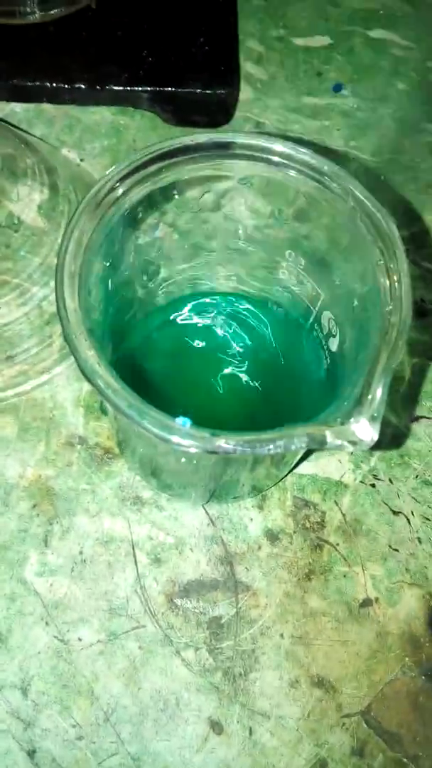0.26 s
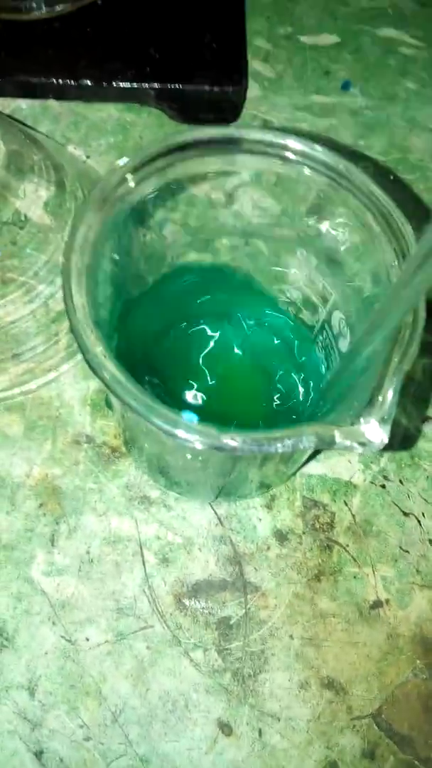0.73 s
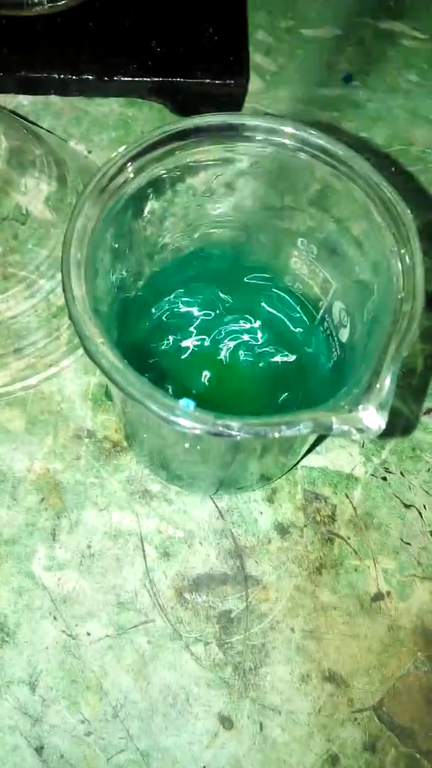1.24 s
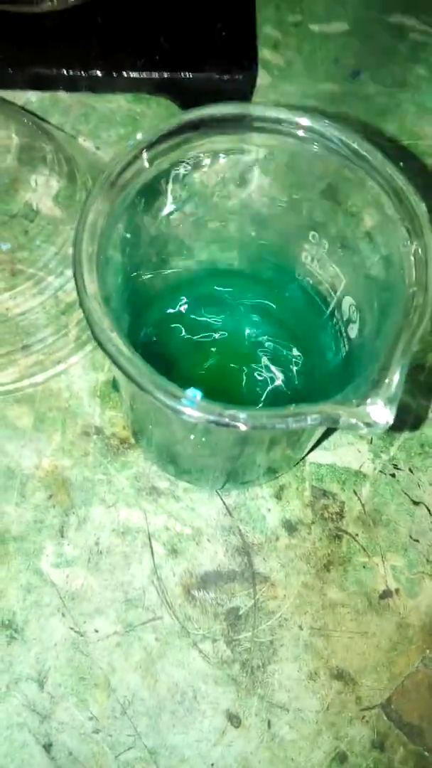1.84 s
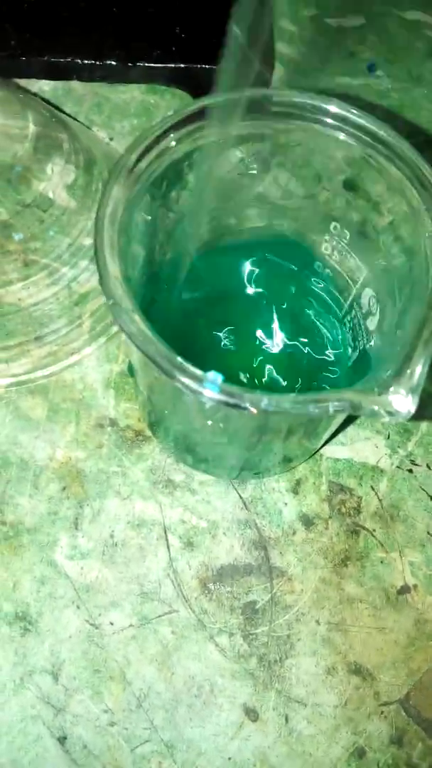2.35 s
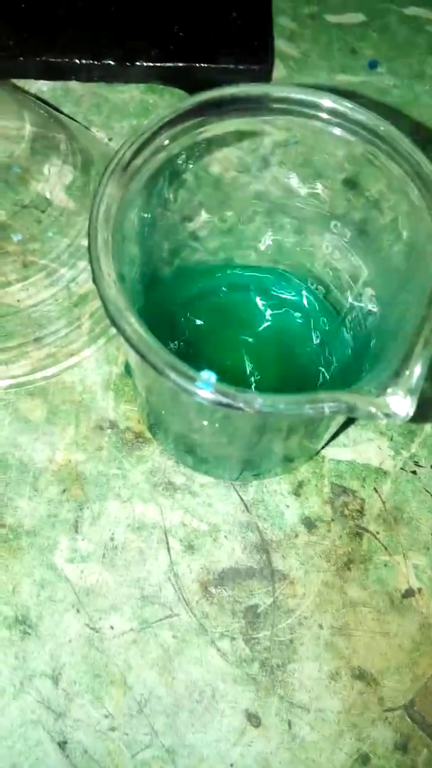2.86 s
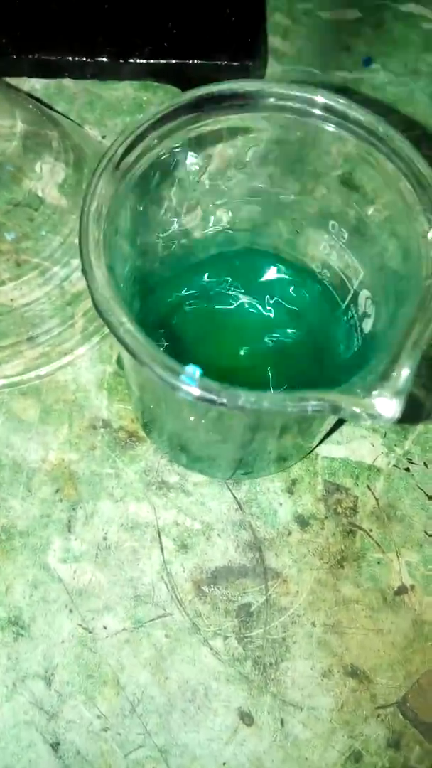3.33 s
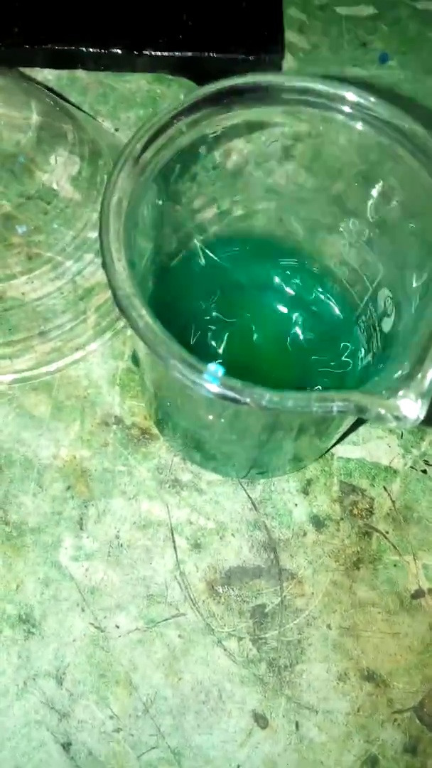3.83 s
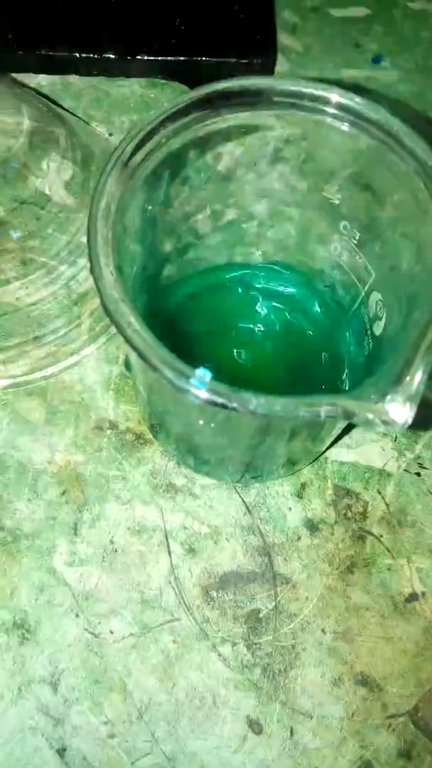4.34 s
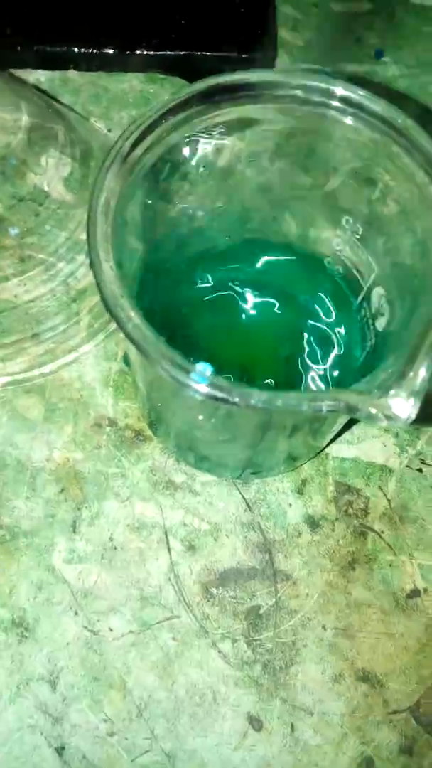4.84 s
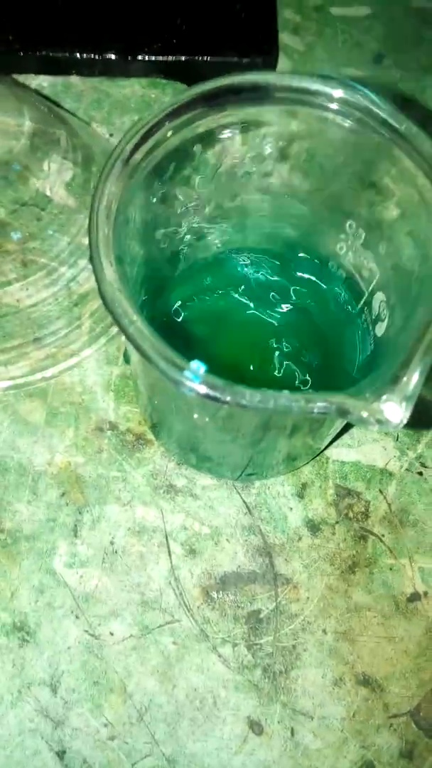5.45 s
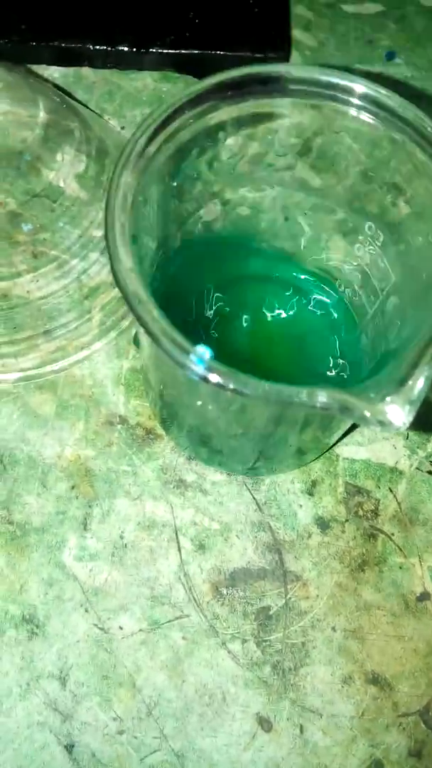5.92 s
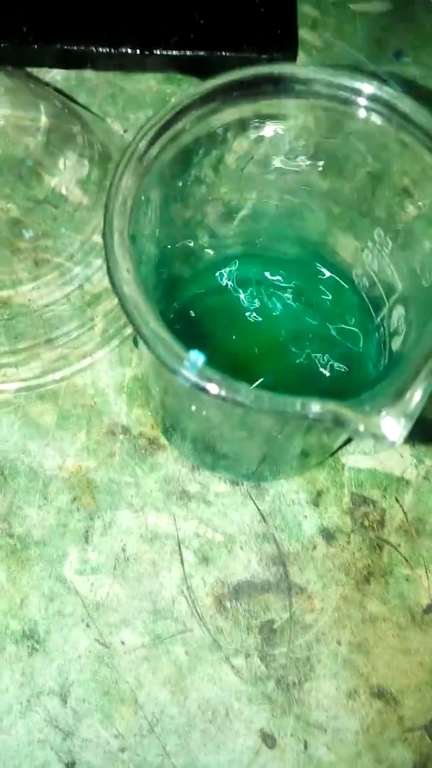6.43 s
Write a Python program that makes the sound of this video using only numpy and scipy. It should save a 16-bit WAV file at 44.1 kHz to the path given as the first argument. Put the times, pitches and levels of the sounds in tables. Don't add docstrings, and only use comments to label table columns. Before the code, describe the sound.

A glass rod clinks quickly and irregularly against a small glass beaker while stirring liquid, with tiny gulping bubbles and a low room murmur.

```python
import sys
import numpy as np
from scipy import signal
from scipy.fft import rfft, irfft
from scipy.io import wavfile
from scipy.ndimage import uniform_filter1d

SR = 44100
rng = np.random.default_rng(int(sys.argv[2]) if len(sys.argv) > 2 else 0)


def makeup_ratio(level_db):
    decades = np.asarray(level_db, float) / 20
    return 10 ** decades


def pcm_store(signal):
    levels = np.round(np.clip(np.atleast_2d(signal), -1, 1) * 32767)
    wavfile.write(sys.argv[1], SR, levels.astype(np.int16).T)


N = 294588


def evened(x):
    return x / np.sqrt(np.mean(x ** 2) + 1e-20)


def read(points, hz):
    f, value = np.transpose(points)
    return np.interp(np.log(hz + 1), np.log(f + 1), value)


def curves(rows):
    s, *columns = np.transpose(rows)
    return [np.interp(np.arange(N) / SR, s, column) for column in columns]


def add(mix, s, sound):
    part = mix[round(s * SR):][:len(sound)]
    part += sound[:len(part)]


def ring(x, hz, t60):
    turn = np.exp(2j * np.pi * np.cumsum(hz * np.ones(len(x))) / SR)
    decay = 10 ** (-3 / (t60 * SR))
    return (turn * signal.lfilter([1], [1, -decay], x / turn)).imag


def coloured(x, points):
    gain = makeup_ratio(read(points, np.fft.rfftfreq(len(x), 1 / SR)))
    return irfft(rfft(x) * gain, len(x))


def slow(hz):
    pole = [1, -np.exp(-2 * np.pi * hz * 32 / SR)]
    coarse = rng.standard_normal(N // 32 + 2)
    coarse = signal.lfilter([1], pole, signal.lfilter([1], pole, coarse))
    return np.interp(np.arange(N) / 32, np.arange(len(coarse)), evened(coarse))


# (frequency [Hz], density [dB per Hz])
ROOM_NOISE = [(15, -66), (30, -70), (54, -16.5), (168, 0), (496, -10), (607, 0), (678, -13), (845, -4),
              (1610, -17), (2000, -12.5), (2600, -54), (4400, -120)]
# (frequency [Hz], density [dB per Hz])
MICROPHONE_HISS = [(300, 1), (2000, -29.5), (4500, -40), (9000, -10.5), (13000, -68), (16500, -15.5)]
# (time [s], rise [dB])
SWELLS = [
    (.07, 10),
    (.67, 11),
    (2.3, 13),
    (2.62, -1.5),
    (6.6, 3.5),
]


def air():
    frames, hz = N // 256 + 5, np.fft.rfftfreq(1024, 1 / SR)
    real, imag, patches = rng.standard_normal((frames, 513, 3)).T
    patches = evened(uniform_filter1d(uniform_filter1d(patches, 8, 0), 12, 1))

    t = np.arange(frames) * 256 / SR
    swell_db = -1.0
    for s, db in SWELLS:
        swell_db = swell_db + db * np.exp(-abs(t - s) / np.where(t < s, 0.006, 0.34))
    f = hz[:, None]
    low_share = 1 / (1 + (130 / (f + 1)) ** 2)
    murmur = makeup_ratio(read(ROOM_NOISE, hz)[:, None] + 5.24 * patches + swell_db * low_share)
    hiss = makeup_ratio(read(MICROPHONE_HISS, hz))[:, None] * (f > 200)
    spectrum = (real + 1j * imag) * np.hypot(murmur, hiss)
    noise = signal.istft(spectrum, nperseg=1024, noverlap=768)[1][:N]

    hum = evened(ring(rng.standard_normal(N), 166.6, 0.2))
    hum = hum * makeup_ratio(-9.5 + 5.5 * slow(1.0))
    rumble_hz, heave_s, heave_width_s = 71, 6.36, 0.24
    heave_db = 18 * np.exp(-((np.arange(N) / SR - heave_s) / heave_width_s) ** 2)
    rumble = evened(ring(ring(rng.standard_normal(N), rumble_hz, 0.15), rumble_hz, 0.15))
    rumble = rumble * makeup_ratio(-23 + heave_db)
    return makeup_ratio(-58.5) * coloured(evened(noise) + hum + rumble, [(25, -4), (55, 0)])


# (frequency [Hz], t60 [s])
ROOM_DECAY = [(500, 0.35), (2000, 0.3), (6000, 0.18), (12000, 0.13)]


def room(x):
    taps = np.zeros(SR // 2)
    at = np.arange(200, len(taps) - 20, 20)
    taps[at + rng.integers(0, 20, len(at))] = rng.choice([-1., 1.], len(at))
    hz, t, z = signal.stft(taps, SR, nperseg=256)
    decay = makeup_ratio(-60 * t / read(ROOM_DECAY, hz)[:, None])
    tail = signal.istft(z * decay, SR, nperseg=256)[1]
    return signal.fftconvolve(x, tail / np.linalg.norm(tail))[:N]


# (time [s], level [dB], pitch [Hz])
KNOCKS = [
    (0.688, -44.5, 580),
    (2.242, -40.5, 252),
    (2.635, -62, 330),
    (2.465, -50.5, 644),
    (2.556, -45.5, 420),
    (2.625, -31.5, 680),
    (5.749, -48, 547),
    (6.093, -45, 533),
    (6.5, -45.5, 570),
]


def knocks():
    out, t = np.zeros(N), np.arange(6000) / SR
    for s, db, hz in KNOCKS:
        burst = evened(ring(ring(rng.standard_normal(len(t)), hz, 0.0055), hz, 0.0055))
        add(out, s, makeup_ratio(db - 5.0 - 60 * t / 0.15) * burst * (1 - np.exp(-t / 0.0019)))
    return out


# (time [s], level [dB], pitch [Hz], t60 [s])
BUBBLES = [(0.0966, -32.5, 1070, 0.01), (0.1735, -52.5, 1080, 0.042), (0.2196, -47.5, 1600, 0.026),
           (0.375, -31, 1456, 0.022), (0.5707, -36.5, 1510, 0.018), (0.6876, -22.5, 1850, 0.0093),
           (0.756, -25, 1756, 0.011), (0.8924, -48, 1780, 0.026), (0.9697, -42.5, 1080, 0.028),
           (1.198, -57, 1490, 0.05), (1.904, -34.5, 1597, 0.023), (1.9648, -29, 1547, 0.021),
           (1.987, -41, 1410, 0.024), (2.291, -34, 1870, 0.016), (2.3682, -35.5, 1464, 0.046),
           (2.392, -46, 1450, 0.048), (2.6277, -18.5, 1800, 0.013), (2.6535, -27, 1710, 0.017),
           (2.7354, -45, 1060, 0.024), (3.3333, -33.5, 1702, 0.024), (4.076, -42, 1085, 0.025),
           (5.224, -51, 1088, 0.055), (5.4196, -26.5, 1497, 0.016), (5.6267, -55, 1145, 0.042),
           (6.4745, -41, 1800, 0.018), (6.549, -40.5, 1445, 0.034)]
# (time [s], level [dB], pitch [Hz], t60 [s],
# glide [share of pitch])
DROPLETS = [(0.387, -43.5, 1270, 0.053, 0.092), (0.417, -51, 1315, 0.03, -0.074),
            (.553, -40, 1587, 0.054, -0.1), (0.586, -45.5, 1520, 0.029, 0.11),
            (2.344, -45.5, 1470, 0.092, -0.033), (2.674, -50, 1634, .05, 0.13),
            (5.4372, -45.5, 1334, 0.047, -0.048), (2.024, -46, 2730, 0.026, 0.01),
            (1.032, -39, 2770, 0.031, 0.0018), (1.257, -42, 2720, 0.023, 0.04),
            (1.289, -23.5, 2750, 0.012, 0.096), (2.327, -34, 3700, 0.019, -0.082),
            (2.429, -53, 2700, 0.037, 0.013), (2.996, -48, 2710, 0.037, 0.16),
            (3.495, -16.5, 2920, 0.0088, 0.019), (3.703, -38.5, 5640, 0.018, -0.047),
            (4.195, -53, 3950, 0.048, -0.037), (4.24, -57, 4800, 0.043, 0.043),
            (4.445, -56.5, 4930, 0.044, 0.046), (4.59, -64, 4000, 0.068, -0.045),
            (4.65, -50, 3540, 0.024, -0.027), (5.894, -31.5, 2735, 0.028, -0.12),
            (6.321, -30, 4180, 0.011, -0.1)]


def bubbles():
    out, t = np.zeros(N), np.arange(6000) / SR
    wobble = np.append(slow(124.0), np.zeros(len(t)))
    for s, db, hz, t60, glide in [row + (.035,) for row in BUBBLES] + DROPLETS:
        course = 2 * np.minimum(t / (0.37 * t60), 1) - 1
        pitch = hz * (1 + glide * course + 0.024 * wobble[round(s * SR):][:len(t)])
        gulp = np.sin(2 * np.pi * np.cumsum(pitch) / SR) * makeup_ratio(-60 * t / max(t60, .008))
        splash = evened(ring(ring(rng.standard_normal(len(t)), hz, 0.0054), hz, 0.0057))
        splash = splash * makeup_ratio(-11.0 - 60 * t / (1.88 * t60))
        splash = splash * min(1, (1800 / hz) ** 2)
        add(out, s, makeup_ratio(db + 9.0) * (gulp + splash) * (1 - np.exp(-t / 0.003)) ** 2)
    return out * (1 + 0.14 * slow(290.0))


def liquid():
    return coloured(bubbles() + knocks(), [(60, -42), (200, 4.0)])


# (time [s], blow [dB], upper wall ring [dB], dull part [dB])
CLINKS = [(0.214, -22.5, -35, -23), (0.2966, -25.5, -45, -30), (0.473, -20.5, -48, -12),
          (0.6894, -21.5, -67, -2.5), (0.8869, -22, -35, -10), (1.056, -15.5, -40, -17.5),
          (1.4816, -25.5, -60, -11), (1.6412, -24, -37, -15), (2.2918, -39, -70, 8),
          (2.4144, -20, -38.5, -34), (2.5184, -13.5, -55, -31), (2.626, -19.5, -25.5, -9.5),
          (2.7285, -5, -40, -27), (2.8134, -21.5, -37.5, -39), (2.922, -9, -30, -30.5),
          (3.1896, -37, -40, -34), (3.4108, -33, -39.5, -19), (3.583, -33, -37, -12),
          (4.165, -22, -50, -28), (4.321, -23.5, -34.5, -23), (4.6511, -22, -30.5, -42),
          (4.711, -23, -42, -27), (5.112, -27, -38.5, -19), (5.2083, -12, -45, -34), (5.607, -17, -36, -51),
          (5.7094, -30, -35, -14), (5.8688, -25, -37.5, -12), (5.9733, -15.5, -32, -32),
          (6.0786, -16.5, -31, -22), (6.4773, -22, -39, -11)]
# (time [s], blow [dB], upper wall ring [dB], bounce gap [ms], bounce loss [dB])
BOUNCING = [(0.12, -14, -61, 18, -19), (.167, -17.5, -49, 15.4, -9), (0.375, -4, -42, 12.7, -9),
            (0.5689, -1, -36, 19, -15), (0.6485, -20, -35.5, 10.3, -1), (0.7587, 0.5, -50, 7.8, -26),
            (0.9694, -4, -35, 5.6, -16), (1.0888, -31, -41, 8, 4), (1.1816, -11.5, -60, 4.1, -11),
            (1.3849, -8, -48, 14, -25), (1.5748, -8, -44, 9.5, -4), (1.7571, -15.5, -59, 11, -13),
            (1.963, -2.5, -41, 7.9, -5.5), (2.106, -15, -43, 13, -7.5), (2.352, 0.5, -18, 14.3, -14),
            (2.5515, -31, -68, 12, -1), (3.1011, -9.5, -65, 4.9, -9), (3.31, -29.5, -42.5, 7.8, 5),
            (3.5026, -0.7, -18, 13.4, -10), (4.8384, -11, -30.5, 5.27, 4.5), (5.023, -10, -25, 9, -7),
            (5.418, -4, -28.5, 11, -9), (5.7932, -4.5, -26.5, 6, -11), (6.543, -6, -30, 12.6, -12.5)]
# (time [s], blow [dB])
TICKS = [(0.093, -37), (.7889, -16.5), (0.851, -32), (.8756, -28), (1.3265, -26.5), (1.4147, -20.5),
         (1.6792, -22.5), (2.1662, -26), (2.6148, -25), (2.8605, -30), (2.9578, -22.5), (3.056, -22.5),
         (3.5312, -18), (3.7596, -22.5), (3.779, -30), (3.862, -36), (4.0637, -34), (4.1285, -33),
         (1.297, -29), (4.349, -28), (1.272, -31), (4.5137, -27.5), (4.5523, -27.5), (4.728, -27),
         (4.7492, -20), (5.893, -26), (6.135, -25.5), (6.2515, -23.5), (6.2947, -33), (6.439, -22),
         (.454, -36), (.559, -34), (.749, -49), (.8604, -24), (.933, -37), (2.34, -37), (2.496, -46),
         (2.869, -32), (3.03, -28), (3.049, -33), (3.3, -40), (3.59, -27), (4.476, -44), (4.638, -34),
         (5.241, -43), (5.313, -39), (5.348, -42), (5.506, -35), (5.523, -42), (5.838, -30), (5.916, -34),
         (6.022, -35), (6.072, -37), (6.102, -29), (6.109, -31), (6.126, -32), (6.329, -35), (6.376, -52),
         (6.485, -42), (6.618, -38)]
# (time [s], blow [dB])
GRAZES = [(0.2024, -44), (0.2264, -57), (0.3024, -21.5), (0.4464, -28), (0.4813, -20), (0.6674, -23),
          (0.7784, -29), (1.1104, -18), (1.1354, -39), (1.2569, -40), (1.2905, -29), (1.4481, -30),
          (1.4924, -32), (1.4994, -24.5), (1.5954, -22), (1.8427, -34), (1.9036, -26.5), (2.2313, -31),
          (2.2508, -32), (2.3261, -33), (2.6005, -41), (2.6728, -26.5), (2.6944, -31), (2.8404, -28),
          (2.9896, -25), (3.0024, -24.5), (3.2034, -42), (3.3682, -29), (3.3942, -28), (3.688, -35),
          (3.8764, -28), (3.9464, -47), (3.9584, -33), (3.9764, -32), (4.1354, -28), (4.2028, -29),
          (4.2388, -33), (4.4474, -34), (4.4653, -39), (4.5336, -32), (4.7945, -34), (4.9214, -33),
          (4.9427, -40), (5.0853, -25), (5.1397, -28), (5.2589, -36), (5.3354, -40), (5.9044, -28),
          (5.9249, -27), (6.1624, -27), (6.1854, -33), (6.2824, -24), (6.3034, -28), (6.32, -25.5)]


def blows():
    tick_ring_db, tick_dull_db, dull_db = -18, -25.5, -26.5
    rows = list(CLINKS)
    rows += [(s, db, db + tick_ring_db, tick_dull_db) for s, db in TICKS]
    rows += [(s, db - 4.8, db + tick_ring_db, tick_dull_db) for s, db in GRAZES]
    for s, db, ring_db, gap_ms, loss_db in BOUNCING:
        for gaps, loss in [(0, 0), (1, loss_db), (1.7, loss_db - 12.5)]:
            rows.append((s + gaps * gap_ms / 1000, db + loss, ring_db + loss, dull_db))
    return rows


def strikes(rows, level_db):
    train = np.zeros(N)
    train[np.round(np.array(rows)[:, 0] * SR).astype(int)] = makeup_ratio(level_db)
    return train


def lift_db(t):
    firm = [s for s, db, *_ in CLINKS + BOUNCING + TICKS if db > -15]
    firm = np.sort(firm + [99.])
    return -19 * np.exp((t - firm[np.searchsorted(firm, t)]) / 0.02)


# (time [s], drag [dB], wall hum [dB])
DRAG = [(0.0, -58, -54.5), (.46, -57.5, -55), (.61, -46, -43.5), (.91, -54, -45.5), (1.11, -47, -45.5),
        (1.56, -49.5, -61), (1.73, -47, -52), (1.99, -41.5, -49.5), (2.18, -59.5, -53), (2.38, -45.5, -59),
        (3.39, -56.5, -44.5), (3.79, -56.5, -66), (4.3, -57, -54), (5.0, -58, -52), (5.45, -58, -60),
        (5.71, -53, -54), (6.22, -56.5, -58), (6.68, -58, -94)]
# (frequency [Hz], level [dB], t60 [s])
ROD = [(3617, -16.5, 0.061), (5057, -7, 0.019), (5733, -8, 0.069), (7470, 5.5, 0.014), (7970, 9, 0.0043),
       (9030, -3, 0.025), (9523, 7, 0.01), (9950, 4, 0.012), (10536, -3, 0.022), (11440, -10.5, 0.019),
       (12050, -10.5, 0.016), (13330, -11, 0.011), (14100, -13.5, 0.012), (15500, -18, 0.024)]
# (frequency [Hz], level [dB])
CRACK = [(470, 3), (800, 7), (1340, -18.5), (2130, -11), (2730, -13), (5110, 0), (7170, 3.5), (9570, 2),
         (14500, -16), (16000, -78)]


def drag():
    ticks = makeup_ratio(2.6 * np.minimum(rng.exponential(1, N), 4))
    ticks = ticks * (rng.random(N) < 5000. / SR)
    ticks = ticks * rng.choice([-1, 1], N) * makeup_ratio(1.8 * slow(19.0))
    tone = np.zeros(N)
    for hz, db, t60 in ROD:
        push = ticks * makeup_ratio(7.0 * slow(24.0))
        tone += makeup_ratio(db) * ring(push, hz * (1 + 0.008 * slow(4.6)), 0.55 * t60)
    rasp = coloured(rng.standard_normal(N) * makeup_ratio(2.5 * slow(12.)), CRACK)
    level_db = curves(DRAG)[0] - 1.9 + lift_db(np.arange(N) / SR)
    return makeup_ratio(level_db) * evened(evened(tone) + 0.18 * evened(rasp))


# (time [s], level [dB], pitch [Hz])
GLINTS = [(0.477, -34.5, 8720), (1.195, -38, 9470), (2.163, -37, 7340), (2.547, -26, 9510),
          (3.865, -51, 9900), (3.896, -44, 9570), (4.075, -45, 9460), (4.08, -50, 7300), (3.632, -56, 7250),
          (3.89, -53, 5650), (4.095, -50, 9600), (4.199, -49, 9560), (4.244, -51, 10050),
          (4.285, -58, 9550), (4.335, -50, 10800), (4.36, -56, 10500), (6.155, -45, 9900),
          (6.57, -46, 9760), (2.371, -32, 9420), (4.245, -50, 7960), (4.265, -59, 9650), (4.436, -50, 9900),
          (4.46, -49.5, 12050), (4.635, -44, 9880), (5.351, -56, 7350), (6.235, -52, 9840),
          (6.235, -53, 7160), (6.35, -55, 9660), (6.65, -51, 9800)]


def glints():
    out, t = np.zeros(N), np.arange(3000) / SR
    swell = (1 - np.exp(-t / 0.0033)) ** 2 * np.exp(-t / 0.0052)
    for s, db, hz in GLINTS:
        noise = rng.standard_normal(len(t))
        squeal = evened(ring(ring(noise, hz, 0.013), hz, 0.013))
        add(out, s, makeup_ratio(db + 15.0) * swell * squeal)
    return out


# (time [s], share of the higher twin [0-1])
PLACE = [
    (0, 0.03),
    (1, 0.2),
    (2, 1),
    (3, 0.9),
    (4, 0.55),
    (5, 0.83),
    (6, 0),
    (6.7, 0.7),
]
# (frequency [Hz], t60 [s])
WALL = [(2576, 0.25), (2613, 0.25)]
# (frequency [Hz], level [dB], t60 [s])
UPPER = [(6468, 0, .09), (6625, -7, .08)]
# (time [s], level [dB], share of the higher twin [0-1])
RINGS = [(0.119, -52, 1), (0.472, -25, 0.73), (0.69, -32, 0.06), (0.887, -34.5, 0.96), (0.97, -33, 0.95),
         (1.081, -40, 0.7), (1.098, -39.5, 0.7), (1.293, -37, 0.73), (1.352, -43, 0.5), (1.413, -38.5, 0),
         (1.4921, -25.5, 0.72), (1.548, -35.5, 0.2), (1.64, -43, 0.5), (1.6794, -41.5, 0.8),
         (1.904, -33, 0), (1.9651, -32.5, 0.9), (2.3545, -35, 0.4), (2.442, -45.5, 0.3),
         (2.6307, -36.5, 0.24), (2.727, -52, 0.2), (2.863, -48.5, 0.2), (3.0133, -34.5, 0.9),
         (3.103, -31, 0.65), (3.3148, -39.5, 1), (3.41, -36, 0.7), (3.5017, -27.5, 0.24), (3.759, -41.5, 0),
         (3.784, -42.5, 1), (3.96, -43.5, 0.27), (4.1224, -43.5, 0.3), (4.18, -43.5, 0), (4.3219, -40, 0),
         (4.5075, -45.5, 0), (4.574, -53, 0), (4.7139, -40, 0.67), (4.8385, -40, 0), (5.026, -36, 0.2),
         (5.0885, -43, 0.86), (5.419, -46, 1), (5.725, -43, 0.2), (5.794, -40, 0), (5.975, -45.5, 0),
         (6.0771, -36, 0.74), (6.103, -31.5, 0.78), (6.185, -41, 0), (6.2536, -42.5, 0.2), (6.295, -41, 0),
         (6.476, -33, 0.8), (6.542, -34, 0)]


def wall():
    drag_db, hum_db = curves(DRAG)
    hits = np.array(blows())
    low = strikes(hits, hits[:, 1] - 35.5) + makeup_ratio(hum_db - 29.5) * rng.standard_normal(N)
    high = strikes(hits, hits[:, 2] - 1.5) + makeup_ratio(drag_db - 36.0) * rng.standard_normal(N)

    share = np.clip(curves(PLACE)[0] + .12 * slow(5.), .15, .85)
    parts = np.sqrt([1 - share, share])
    _, ring_db, side = np.transpose(RINGS)
    side = np.clip(side, .02, .98)
    out = np.zeros(N)
    for (hz, t60), part, power in zip(WALL, parts, (1 - side, side)):
        square = strikes(RINGS, ring_db + 1.87 + 10 * np.log10(power))
        out += ring(low * part + square, hz * (1 + .001 * slow(7.)), t60)
    out = ring(out, 2635, 0.013) / 50.5

    for hz, db, t60 in UPPER:
        twin = ring(high * makeup_ratio(2.2 * slow(9.)), hz * (1 + .0022 * slow(6.)), t60)
        out = out + makeup_ratio(db + 3.5 * slow(60.)) * twin
    return out


def clinks():
    out, t = np.zeros(N), np.arange(2048) / SR
    hz, db, t60 = np.transpose(ROD)[:, :, None]
    t60 = np.minimum(t60, .03)
    for s, blow_db, _, dull_db in blows():
        share, detune, phase = rng.standard_normal((3, len(ROD), 1))
        noise = rng.standard_normal(len(t))
        bright_db = -10 + 0.068 * blow_db + 1.5 * np.tanh(noise[0])
        glance = 1 / (1 + makeup_ratio(blow_db + 24.0))

        tilt = [(1200, dull_db + 16.0), (2800, dull_db + 30.5), (4500, dull_db + 15.5),
                (6500, 0.032), (10500, 0.0093), (12500, bright_db + 16.0)]
        tilt = [(f, gain + 4.5 * np.tanh(z)) for (f, gain), z in zip(tilt, noise[1:])]

        modes = np.sin(2 * np.pi * hz * (1 + .009 * detune) * t + phase)
        modes = modes * makeup_ratio(db + 7.1 * np.tanh(share) - 60 * t / t60)
        crack = evened(coloured(noise, CRACK)) * makeup_ratio(-2.0 - 60 * t / (0.017 + 0.024 * glance))
        blow = coloured(0.57 * modes.sum(0) + crack, tilt)
        rise_s = 0.00026 + 0.00024 * glance
        blow = blow * (1 - np.exp(-t / rise_s)) * np.cos(np.pi / 2 * t / t[-1])
        add(out, s, makeup_ratio(blow_db - 2.5) * blow / abs(np.diff(blow)).max())
    return coloured(out, [(80, -70), (500, -31), (1400, 0.5)])


def scene():
    glass, wet = clinks() + glints(), liquid()
    direct = glass + wall() + drag() + wet
    return (direct + room(makeup_ratio(-10.5) * (glass + wet)) + air())[None]


def roll_off(x):
    return signal.sosfilt(signal.butter(12, 16840, fs=SR, output="sos"), x)


def record(dry):
    edge = signal.firwin(255, 15750, window=("kaiser", 7), fs=SR)
    x = signal.oaconvolve(dry, edge[None], "same")
    x = x + .03 * (dry - x)
    return roll_off(x)


dry = scene()
out = record(dry)
pcm_store(out)
```